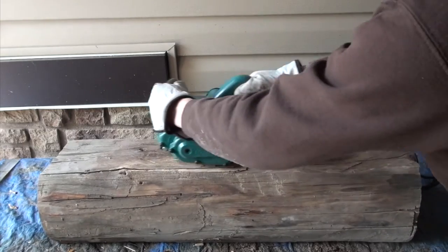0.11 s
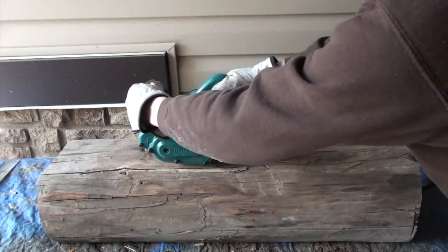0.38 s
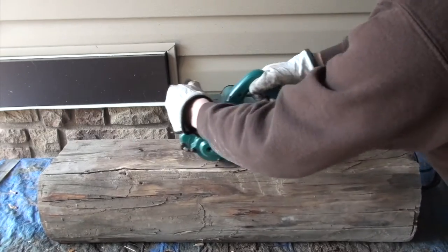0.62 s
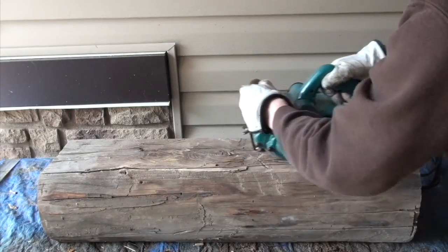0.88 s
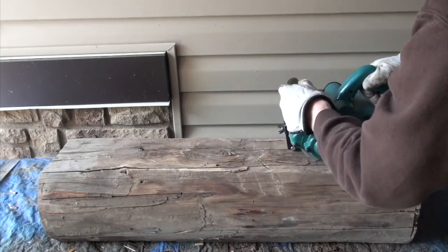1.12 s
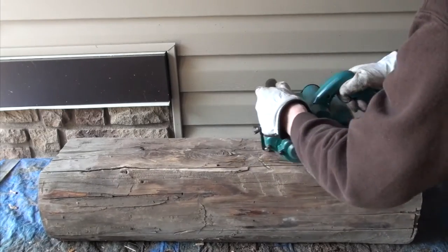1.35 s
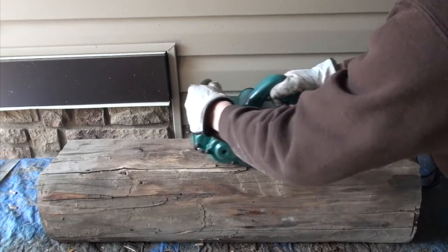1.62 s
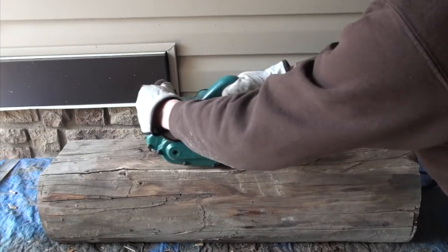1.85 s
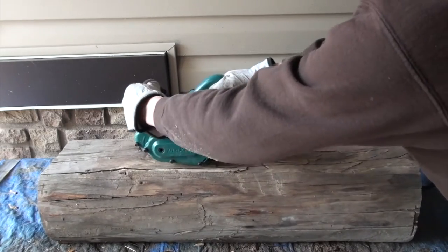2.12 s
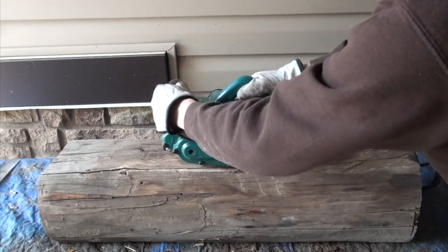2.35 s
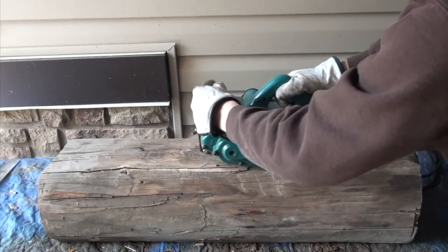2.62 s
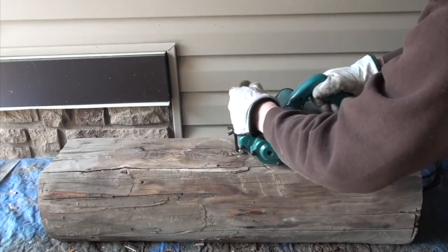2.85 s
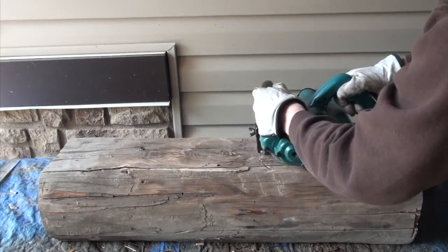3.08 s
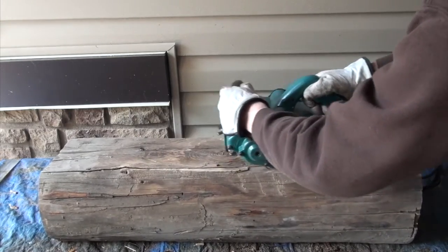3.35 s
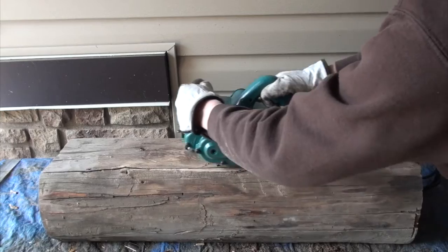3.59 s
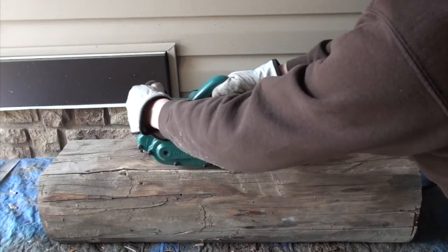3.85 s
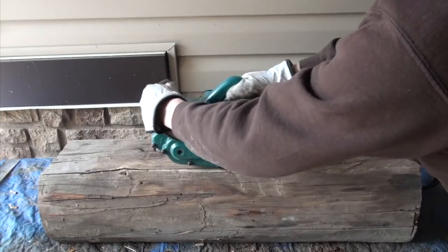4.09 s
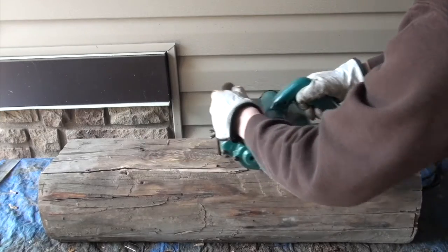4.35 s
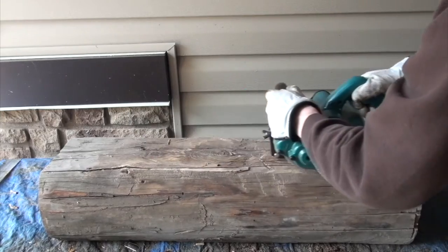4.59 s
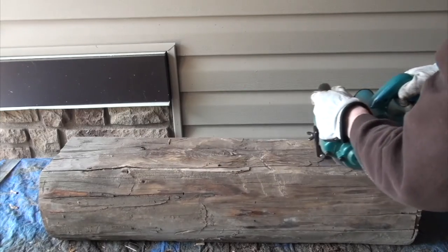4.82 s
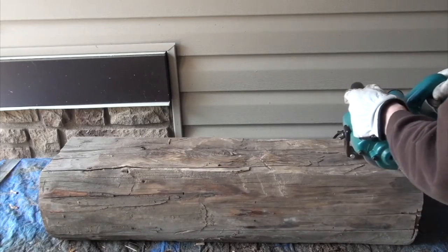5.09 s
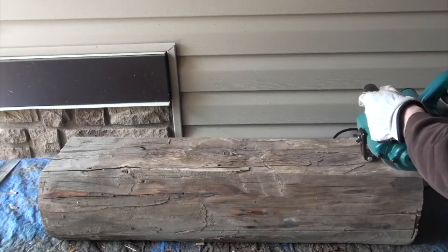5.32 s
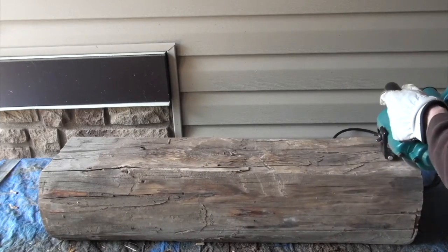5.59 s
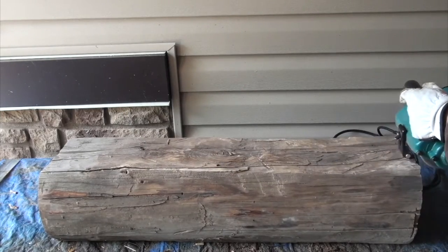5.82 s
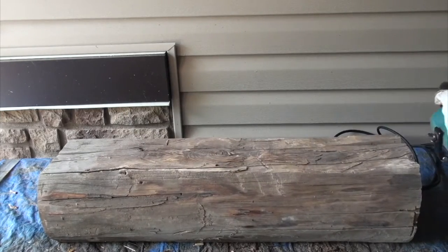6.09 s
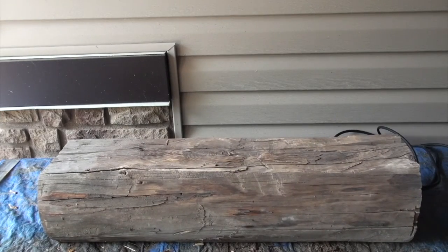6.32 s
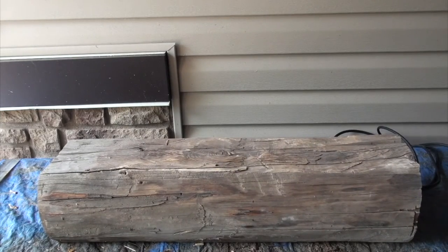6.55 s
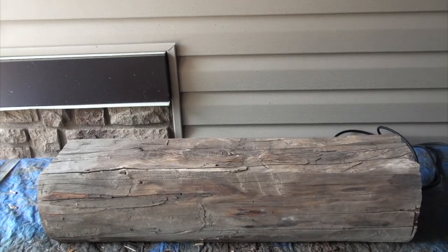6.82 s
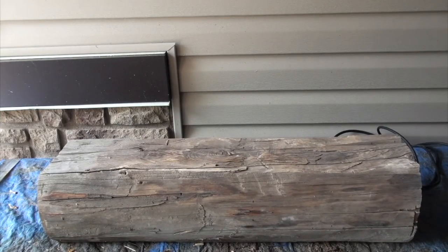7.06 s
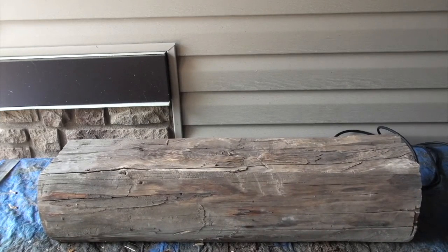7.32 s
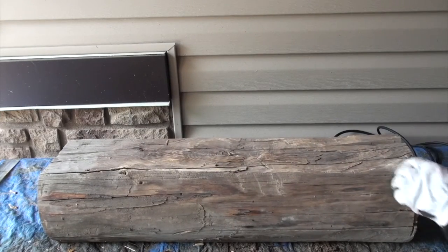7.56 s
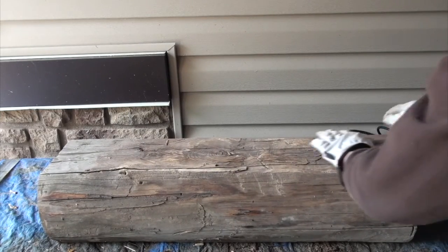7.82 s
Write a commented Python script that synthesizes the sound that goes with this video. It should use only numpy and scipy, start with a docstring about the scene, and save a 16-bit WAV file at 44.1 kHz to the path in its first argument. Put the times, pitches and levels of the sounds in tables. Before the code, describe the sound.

Close outdoors, an electric wheel sander runs on a weathered log with a piercing gear whine, casing rattle, rushing air and crisp bristle hiss. Its pitch wavers as the load changes with each stroke. At about six seconds it is switched off, the whine dropping and vanishing in roughly half a second. A quiet yard remains, with low rumble, soft hiss, tiny rustles and two small wooden knocks near the end.

```python
"""A geared wheel sander runs on a dry log: gears whine at the tooth-mesh rate and its harmonics, the motor
fan sings, and shaped noise gives casing rattle, air rush and bristle hiss; loose teeth ring the casing.
A quiet yard of rumble, hums and hiss lies under it, with a faint low thump near 3.1 s.
At 5.97 s the tool is switched off and brakes fast, its pitch falling and its noise fading within 0.6 s.
The yard remains, with short puffs of noise and, near 7.4 s, two small knocks with wooden rings."""
import sys
import numpy as np
from scipy import signal
from scipy.fft import rfft, irfft, next_fast_len
from scipy.io import wavfile
from scipy.ndimage import uniform_filter1d, map_coordinates

SR = 44100
rng = np.random.default_rng(int(sys.argv[2]) if len(sys.argv) > 2 else 0)


def persist_wave(psi):
    """Save psi, clipped to +-1, as 16-bit WAV."""
    counts = np.round(np.clip(psi, -1, 1) * 32767).astype(np.int16)
    wavfile.write(sys.argv[1], SR, np.atleast_2d(counts).T)


def decibels_to_gain(level_db):
    """Convert a level in decibels to a linear amplitude gain (20 dB per decade)."""
    exponent = np.asarray(level_db, float) / 20
    return 10 ** exponent


N = 349705

# gear mesh rate as the load slows the motor, before inertia and braking: (t/s, f/Hz)
MESH_SPEED = [(0, 2252), (0.17, 2172), (0.34, 2133), (0.51, 2055), (0.6, 2026), (0.68, 2070), (0.85, 2261),
              (1.02, 2384), (1.19, 2470), (1.28, 2490), (1.36, 2461), (1.53, 2293), (1.7, 2197),
              (1.87, 2125), (2.04, 2098), (2.21, 2091), (2.46, 1989), (2.72, 1941), (2.8, 1972),
              (2.89, 2025), (3.0, 1986), (3.23, 1993), (3.36, 2010), (3.49, 2101), (3.82, 2105),
              (4.08, 2120), (4.42, 2088), (4.63, 2064), (4.78, 2094), (4.93, 2091), (5.18, 2027),
              (5.35, 2048), (5.52, 2130), (5.7, 2191), (5.86, 2303), (5.95, 2368)]
# clean line of the 1st, 2nd and 5th mesh harmonics, and fan tone:
# (t/s, 1st level/dB, 2nd level/dB, 5th level/dB, fan level/dB)
GEARS = [(0.0, -28.5, -21, -27, -29), (0.18, -16.7, -35, -38, -32), (0.28, -25.5, -27.5, -31, -31),
         (0.41, -20.3, -22.8, -33.5, -32.3), (0.56, -23.5, -29, -33.5, -35.5), (0.65, -24, -33, -38, -29),
         (0.72, -21, -34, -36, -40), (1.13, -28, -35, -35, -21.5), (1.3, -30, -24, -46, -23),
         (1.39, -26, -30, -41, -25), (1.5, -24, -30, -30.5, -32), (1.57, -29, -29, -27.5, -35),
         (1.73, -17.5, -25, -37, -33), (1.93, -24, -31.5, -33.1, -24.5), (2.04, -18.9, -18.5, -31.5, -33),
         (2.3, -23, -25, -35.5, -32.5), (2.66, -22, -29, -32, -33), (2.85, -24, -30, -36, -38.1),
         (2.97, -20, -27.5, -30, -36), (3.12, -24.5, -23, -35, -33), (3.34, -18.5, -28.5, -37, -34),
         (3.42, -29, -29, -44, -35.9), (3.62, -19, -29.5, -36, -27), (3.75, -24, -24.5, -35, -33.8),
         (3.91, -20, -31.5, -32, -28), (4.09, -24.5, -31, -31, -26), (4.37, -19.5, -22.5, -40, -31),
         (4.45, -24.5, -31, -33, -40), (4.59, -21.5, -28.5, -36, -34), (4.81, -25, -25, -28.5, -33),
         (4.91, -21.5, -30, -37.4, -36), (5.33, -18.5, -26, -30.9, -34), (5.45, -23, -22, -39, -33),
         (5.55, -30, -35.5, -32, -29.6), (5.87, -22, -35, -37, -29), (5.95, -29, -35, -45, -25)]
# what the casing passes of a falling harmonic: (f/Hz, level/dB)
BRAKING_PASS = [(500, -50), (850, -30), (1050, -20.5), (1300, -28), (1700, -24), (2200, -29), (2800, -19.5),
                (3400, -26), (4000, -30), (5000, -52), (12000, -38)]
# side strands of a chattering mesh: (offset/motor pulse rate, share/1)
STRANDS = [(-2, .2), (-1, .4), (0, .3), (1, .4), (2, .25), (3, .25)]
# thin lines turning with the motor: (f/mesh rate, relative level/dB)
ORDERS = [(2 / 7, -25), (3 / 7, -22), (3 / 4, -21), (1.81, -13), (2.81, -21), (24 / 7, -23), (4.624, -26)]
# power beside the line at full chatter: (1st level/dB, 2nd level/dB)
SPILL_DB = (6, 5.5)
# relative noise levels under load: (t/s, bristle hiss level/dB, casing rattle level/dB, air near 3 kHz level/dB)
RUSH = [(0.0, -20, -27.5, -28), (0.18, -23.5, -31, -31), (0.3, -21.5, -28.5, -30.5),
        (0.45, -24, -30, -29.5), (0.78, -22, -27, -28.5), (1.19, -20, -27.5, -29),
        (1.21, -20.5, -30.5, -31), (1.37, -20.5, -26.5, -28), (1.52, -20, -29.5, -29),
        (1.64, -20.5, -26, -26.5), (1.74, -21.5, -32, -29), (1.8, -20.5, -27.5, -28),
        (2.22, -27, -33.5, -32), (2.25, -22, -28.5, -29.5), (2.71, -20.5, -27.5, -27.5),
        (3.22, -20, -28.5, -30), (3.31, -24, -33, -29), (3.32, -21.5, -28, -28), (4.0, -22, -29.5, -29),
        (4.12, -20, -27, -27.5), (4.27, -22, -30, -28.5), (4.73, -22, -29, -29.5), (4.75, -25, -23, -28),
        (4.78, -24, -32, -29.5), (4.85, -20.5, -28, -29), (4.96, -25, -33, -33), (5.0, -23.5, -30.5, -29.5),
        (5.38, -25, -30.5, -31.5), (5.41, -22, -26, -27), (5.44, -25, -34, -32), (5.49, -22.5, -26, -28.5),
        (5.74, -20, -29.5, -29), (5.89, -22, -26.5, -29), (5.94, -21.5, -28, -31)]
# brief noise swells, catches on cracks and one at switch-off: (t/s, level/dB, Gaussian sigma/s)
SWELLS = [(0.343, 1.5, 0.014), (0.645, 3, 0.022), (1.66, 1, 0.017), (2.261, 3.5, 0.0097),
          (2.86, 0.5, 0.029), (3.391, 1, 0.016), (4.45, 2, 0.021), (5.521, 1.5, .025), (5.97, 2.5, .015)]
# noise colours: (f/Hz, relative level per Hz/dB)
RATTLE_COLOUR = [(88, -52), (150, -27), (237, -16.5), (407, -14), (586, -4.5), (775, -2.5), (869, -1),
                 (1190, -0.5), (1420, 2), (1670, -2), (1800, -1), (2340, 0.5), (3960, -120)]
AIR_COLOUR = [(1200, -36), (1700, -14), (2300, -5.5), (2600, -0.5), (2830, 4), (3100, 3), (3600, 2.5),
              (4100, 2.5), (4700, 1), (5500, -4), (7000, -33)]
BRISTLE_COLOUR = [(4500, -30), (5500, 0), (7000, -1.5), (9000, -2.5), (11000, -3), (12500, -4.5),
                  (14000, -11), (15800, -17)]
YARD_COLOUR = [(15, -30), (35, -12), (70, -8), (140, -16), (190, -8), (300, -9), (520, -5), (800, -7),
               (1100, -10), (1600, -11.5), (3000, -12), (4200, -10), (8000, -17.5), (15500, -31.5)]
DEEP_COLOUR = [(15, -30), (30, -8), (60, -9), (120, -0.5), (170, -10), (260, -30)]
# gains around and after switch-off; the first row holds before it, gear tones excepted:
# (t/s, rattle level/dB, air level/dB, bristle level/dB, loose teeth level/dB, gear tones level/dB)
RUNDOWN = [(5.96, 1.5, -2, -3.5, -1, -4), (6.0, 0, 3.5, -1, 6, 1), (6.04, -5, 1, -6, 1.5, -0.5),
           (6.12, -10, -6, -12, -3, -0.5), (6.15, -7, -8, -19, -9, -8.5), (6.18, -7, -10, -23, -9.5, -21.5),
           (6.22, -8, -16, -26, -17, -22), (6.28, -12, -17, -31, -14, -30),
           (6.34, -14.5, -21, -33, -9, -40), (6.4, -16.5, -29, -42, -19, -50),
           (6.44, -26, -36, -46, -21, -60), (6.47, -28, -39, -48, -32, -60),
           (6.56, -58, -65, -67, -60, -63)]
# loose teeth knocking as the load comes off, relative: (t/s, level/dB)
BACKLASH = [(0, -35.5), (.6, -37), (.8, -25.5), (1.1, -27), (1.35, -23), (1.55, -35), (2.7, -41.5),
            (5.4, -40), (5.55, -26), (5.75, -27.5), (5.93, -26)]
# casing resonances: (f/Hz, width/Hz, relative level/dB)
CASING = [(1070, 84, 3.5), (1300, 140, -1), (2037, 93, 1.5), (2480, 160, -12), (2666, 160, 4.5),
          (3700, 290, -2.5), (4080, 220, -2.5)]
# yard, relative: (t/s, rumble level/dB, hiss level/dB)
YARD_LEVELS = [(6.5, -42, -56.5), (6.702, -43, -56), (7.088, -42.5, -54.5), (7.406, -41.5, -56),
               (7.562, -39, -56.5), (7.93, -38, -54)]
# deep rumble through ground and log, relative: (t/s, level/dB)
DEEP_LEVELS = [(0, -58), (4.4, -55), (5.4, -62.5), (7.27, -50.5), (7.69, -53), (7.93, -50)]
# faint wavering hums: (f/Hz, relative level/dB, width/Hz)
HUMS = [(38.8, -1, 4), (83, -1, 4.7), (140, -1, 4.5), (228, 4.5, 6.1), (326, 0.5, 11), (435, -3, 8.1),
        (554, -4, 20), (690, -4, 22)]
# short noise puffs: (t/s, relative level/dB, centre f/Hz, sigma/octaves, Gaussian sigma/s)
PUFFS = [(3.06, -45, 146, 0.34, 0.033), (6.943, -41, 6400, 0.1, 0.02), (18, -46, 5000, 0.81, 0.038),
         (7.22, -58, 35, 0.55, 0.036), (7.56, -47, 7000, .8, 0.016), (7.622, -40.5, 4700, 0.97, 0.034),
         (7.62, -43, 9600, 0.12, 0.018), (7.6, -36, 2400, .8, 0.0033), (7.68, -42, 520, .7, 0.0068)]
# knocks: (t/s, relative level/dB, lowest ring f/Hz)
KNOCKS = [(7.359, -24.5, 2140), (7.403, -24.5, 1010)]
# wooden rings: (f/lowest ring, relative level/dB, t60 with the lowest ring at 1200 Hz/s)
WOODEN = [(1, 0.5, 0.12), (1.27, 2, .05), (1.6, -13, .04), (2.3, -14, .04), (3.3, -10, .03)]
# side over mid: (f/Hz, relative level/dB)
WIDE_TOOL = [(60, -28), (200, -11.5), (450, -15.5), (770, -9), (1200, -11.5), (2100, -12), (2900, -26.5),
             (4200, -21.5), (5000, -37), (9300, -38), (10500, -15.5), (11500, -29), (13000, -40)]
WIDE_YARD = [(60, -38), (130, -30), (290, -18), (640, -11), (1410, -5), (3100, -7.5), (6820, -16.5),
             (11000, -1), (11800, -50)]
# extra side of the tool over time, widest near 1.2 s and towards the end: (t/s, level/dB)
SPREAD = [(0, -1.5), (.8, -1.5), (1.2, 3), (1.6, -1.5), (3.5, -1), (4.5, -1), (5.2, 2.5), (6.2, 3.5)]
# left over right in the middle range: (t/s, level/dB)
PAN = [(0.0, -0.5), (3.2, -1.5), (4.17, 0.5), (5.12, -5), (6.36, -1.5), (6.58, 3.0), (7.33, 4),
       (7.35, -2.5), (7.53, 3), (7.93, 4)]

PULSE_HZ = 120  # the motor's pull pulses at twice the line frequency
WHEEL_TEETH = 54  # tooth meshes per wheel turn
OFF_S, BRAKE_S = 5.97, .098  # switch-off; the speed then falls by 1/e every BRAKE_S
BRAKE_CHATTER = .75  # share of full chatter
CLEAN_DB, SMEAR_DB = (-16, -18), 11.5  # line level with no chatter (1st, 2nd); drop to full chatter
THIRD_DB, THIRD_WAVERS_DB = -32.5, 1.5
AIR_WIDE_DB = 7.5  # the whole air rush over its part near 3 kHz
TOP_HZ = 15700


def unit(x):
    """Scaled to rms 1."""
    return x / np.sqrt(np.mean(np.abs(x) ** 2) + 1e-20)


def along(points, hz):
    """Interpolates (Hz, value) points on a log axis."""
    f, v = np.transpose(points)
    return np.interp(np.log(hz + 1), np.log(f + 1), v)


def curves(rows):
    """One value per sample for each column after the time."""
    s, *cols = np.transpose(rows)
    return [np.interp(np.arange(N) / SR, s, c) for c in cols]


def wobble(rate_hz):
    """A smooth random curve, rate_hz knots a second."""
    knots = rng.standard_normal(int(N * rate_hz / SR) + 4)
    return map_coordinates(knots, [np.arange(N) * rate_hz / SR])


def flutter(rate_hz):
    """A complex random gain of rms 1: spreads a tone over about rate_hz."""
    return unit(wobble(rate_hz) + 1j * wobble(rate_hz))


def filtered(x, response):
    """x times a response of frequency, zero-padded."""
    m = next_fast_len(N + 8192)
    return irfft(rfft(x, m) * response(np.fft.rfftfreq(m, 1 / SR)), m)[..., :N]


def rush(colour):
    """Two unrelated noises of one colour, rms 1."""
    return unit(filtered(rng.standard_normal((2, N)), lambda hz: decibels_to_gain(along(colour, hz))))


def speed():
    """Gear mesh rate in Hz: set by the load, rounded by inertia, then braking exponentially."""
    t = np.arange(N) / SR
    loaded_hz = uniform_filter1d(curves(MESH_SPEED)[0], size=2000)
    return loaded_hz * np.exp(-np.maximum(t - OFF_S, 0) / BRAKE_S)


def whine():
    """Gear teeth meet at the mesh rate; loose chatter moves power from each line into strands and a skirt."""
    hz, after = speed(), np.arange(N) / SR - OFF_S
    first_db, second_db, fifth_db, fan_db = curves(GEARS)
    loose, looser = [np.clip(np.abs((clean - db) / SMEAR_DB) ** 1.52, .03, 1)
                     for clean, db in zip(CLEAN_DB, (first_db, second_db))]
    first_db = first_db + SPILL_DB[0] * loose
    second_db = second_db + SPILL_DB[1] * looser - np.maximum(hz - 2200, 0) / 40
    third_db = THIRD_DB + THIRD_WAVERS_DB * wobble(10)
    fourth_db = (third_db + fifth_db) / 2 - 1.5
    sixth_db = fifth_db - 8 - np.maximum(hz - 2150, 0) / 30  # the casing passes little above 13 kHz
    braking_db = curves(RUNDOWN)[4]

    def level(db, k):
        return np.where(after < 0, db, along(BRAKING_PASS, k * hz) - 1.47 * k + braking_db)

    turn = 2 * np.pi * np.cumsum(hz) / SR  # mesh phase, rad
    pulse = 2 * np.pi * PULSE_HZ * np.arange(N) / SR
    upper = 0.42 + 0.53 * loose  # the high harmonics smear with the first
    teeth = [(1, first_db, loose), (2, second_db, looser), (3, third_db, upper),
             (4, fourth_db, upper), (5, fifth_db, upper), (6, sixth_db, upper)]
    out = np.zeros((2, N))
    for k, db, chatter in teeth:
        chatter = np.clip(np.where(after < 0, chatter, BRAKE_CHATTER), 0, 1)
        line = decibels_to_gain((1.18 + 0.6 * k) * wobble(25)) * np.exp(2.6j / k * chatter ** 2 * wobble(70))
        line = line * (1 + 0.15 * k * np.exp(1j * turn / WHEEL_TEETH))
        strands = sum(share * (0.26 + 0.8 * flutter(30)) * np.exp(1j * step * pulse)
                      for step, share in STRANDS)
        skirts = np.array([flutter(260 + 80 * k), flutter(260 + 80 * k)])
        smear = strands + (0.45 + 0.28 * min(k, 2)) * skirts
        shape = np.sqrt(1 - chatter) * line + np.sqrt(chatter) * smear
        out += np.sqrt(2) * decibels_to_gain(level(db, k)) * (shape * np.exp(1j * k * turn)).imag
    fan_gain = np.sqrt(2) * decibels_to_gain(level(fan_db, 12 / 7) + 2.2 * wobble(18)) * (1 + 0.22 * np.cos(pulse))
    fan = fan_gain * np.sin(12 / 7 * turn + .45 * wobble(40))
    thin = sum(decibels_to_gain(level(first_db, 0.93) + db + 3.0 * wobble(9.6)) * np.sin(k * turn + 0.23 * wobble(40))
               for k, db in ORDERS)
    return out + fan + thin, turn


def swells():
    """Brief Gaussian noise swells in dB: catches on cracks, and one at switch-off."""
    t = np.arange(N) / SR
    return sum(db * np.exp(-.5 * ((t - s) / sigma_s) ** 2) for s, db, sigma_s in SWELLS)


def slowed(hiss):
    """Slower bristles lose their top."""
    dull = filtered(hiss, lambda hz: 1 / (1 + (hz / 8500) ** 4))
    return dull + np.clip(speed() / 1900, 0, 1) ** 1.3 * (hiss - dull)


def roar(turn):
    """Casing rattle, cooling air and bristles on wood: noises swelling with the wheel turn and at random."""
    hiss_db, case_db, blow_db = curves(RUSH) + swells()
    rattle_db, air_db, bristle_db = curves(RUNDOWN)[:3]
    wheel, scrub = np.sin(turn / WHEEL_TEETH), wobble(30)
    case_db = case_db + rattle_db + 0.71 * wobble(14) + 0.68 * wobble(60)
    case_db = case_db + 0.52 * np.sin(3 * turn / WHEEL_TEETH)  # three swells a wheel turn
    blow_db = blow_db + AIR_WIDE_DB + air_db + 0.54 * wobble(14) + 0.38 * wheel + 0.65 * scrub
    hiss_db = hiss_db - 0.5 + bristle_db + 0.74 * wobble(20) + 0.42 * wheel + 0.77 * scrub
    hiss_db = hiss_db + 1.5 * wobble(900)  # fine grain
    rattle = decibels_to_gain(case_db) * rush(RATTLE_COLOUR)
    air = decibels_to_gain(blow_db) * rush(AIR_COLOUR)
    bristle = decibels_to_gain(hiss_db) * slowed(rush(BRISTLE_COLOUR))
    return rattle + air + bristle


def backlash(turn):
    """Uneven knocks, bunched once a wheel turn, ring fixed casing modes; slow knocks are softer and duller."""
    level_db = curves(BACKLASH)[0] + curves(RUNDOWN)[3]
    bunched_db = 3.6 * wobble(500) + 1.8 * wobble(45) + 1.8 * np.sin(turn / WHEEL_TEETH)
    blows = rng.standard_normal((2, N)) * decibels_to_gain(bunched_db)

    def modes(f):
        return sum((-1) ** k * decibels_to_gain(db) * 1j * f * w / (c * c - f * f + 1j * f * w)
                   for k, (c, w, db) in enumerate(CASING))

    ring = filtered(blows, modes)
    dull = filtered(ring, lambda hz: 1 / (1 + (hz / 1700) ** 6))
    fast = np.clip(np.gradient(turn) * SR / (2 * np.pi * 900), .25, 1)  # 1 from 900 Hz mesh rate up
    return decibels_to_gain(level_db) * (fast * unit(ring - dull) + (1.2 - 0.71 * fast) * unit(dull))


def yard():
    """Far rumble and smooth hiss from separate noises, a deep rumble, and hums as randomly wavering tones."""
    rumble_db, hiss_db = curves(YARD_LEVELS)
    low = filtered(rush(YARD_COLOUR),
                   lambda hz: 1 / (1 + (hz / 1500) ** 2) / (1 + (170 / (hz + 1)) ** 4))
    high = filtered(rush(YARD_COLOUR), lambda hz: 1 / (1 + (1500 / (hz + 1)) ** 2))
    t = np.arange(N) / SR
    hums = sum(decibels_to_gain(db) * (flutter(width_hz) * np.exp(2j * np.pi * hz * t)).imag
               for hz, db, width_hz in HUMS)
    deep_gain = decibels_to_gain(curves(DEEP_LEVELS)[0] - 3.0 + 3.1 * wobble(5))
    deep = deep_gain * (rush(DEEP_COLOUR) + 1.14 * unit(hums))
    rumble = decibels_to_gain(rumble_db - 5.5 + 1.3 * wobble(22)) * unit(low)
    return rumble + decibels_to_gain(hiss_db + 5.0) * unit(high) + deep


def puffs():
    """Low thumps and grainy rustles: short puffs of noise, each in its own log-Gaussian band."""
    t = np.arange(N) / SR

    def band(hz, octaves):
        noise = rng.standard_normal((2, N))
        return unit(filtered(noise, lambda f: np.exp(-.5 * (np.log2((f + 1) / hz) / octaves) ** 2)))

    return sum(decibels_to_gain(db + 2.2 * wobble(200)) * np.exp(-.5 * ((t - s) / sigma_s) ** 2) * band(hz, octaves)
               for s, db, hz, octaves, sigma_s in PUFFS)


def knocks():
    """Small hard contacts: a broad decaying clack and a few short wooden rings."""
    out, t = np.zeros(N + SR), np.arange(SR // 4) / SR
    for s, db, hz in KNOCKS:
        ring = sum(decibels_to_gain(level - 60 * t / t60 * hz / 1200) * np.sin(2 * np.pi * k * hz * t)
                   for k, level, t60 in WOODEN)
        clack_gain = 2.0 * decibels_to_gain(-60 * t / 0.17) + 1.2 * decibels_to_gain(-60 * t / 0.01)
        clack = clack_gain * rng.standard_normal(len(t))
        out[round(s * SR):][:len(t)] += decibels_to_gain(db - 11.0) * (ring + clack)
    return filtered(out[:N], lambda hz: 1 / (1 + (hz / 3800) ** 4) / (1 + (700 / (hz + 1)) ** 4))


def placed(pair, wide, spread_db=0):
    """Direct sound in the middle; scattered sound, 257 samples later, is opposite in the two ears."""
    scattered = filtered(pair[1], lambda hz: decibels_to_gain(along(wide, hz)))
    side = decibels_to_gain(spread_db) * np.roll(scattered, 257)
    return np.array([pair[0] + side, pair[0] - side])


def scene():
    """Tool over yard; the whole image leans left or right, mostly in the middle range."""
    tones, turn = whine()
    pan_db, = curves(PAN)
    tool = placed(tones + roar(turn) + backlash(turn), WIDE_TOOL, curves(SPREAD)[0])
    ears = tool + placed(yard() + knocks() + puffs(), WIDE_YARD)
    middle = filtered(ears.mean(0), lambda hz: 1 / (1 + (450 / (hz + 1)) ** 4) / (1 + (hz / 2800) ** 6))
    lean = (decibels_to_gain(pan_db) - 1) / (decibels_to_gain(pan_db) + 1) * middle
    return ears + np.array([lean, -lean])


def roll_off(x):
    """The treble ends steeply here."""
    return signal.sosfilt(signal.butter(12, 15680, fs=SR, output="sos"), x)


def record(dry):
    """Rounds off peaks towards 0.76 of full scale and keeps nothing from TOP_HZ up."""
    soft = dry / (1 + np.abs(dry / 0.76) ** 4) ** (1 / 4)
    mix = filtered(soft, lambda hz: hz < TOP_HZ)
    return roll_off(mix)


dry = scene()
out = record(dry)
persist_wave(out)
```